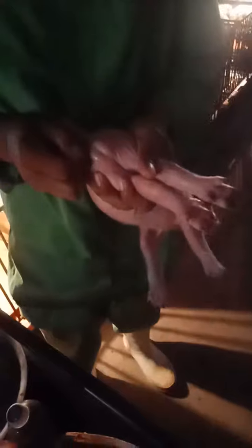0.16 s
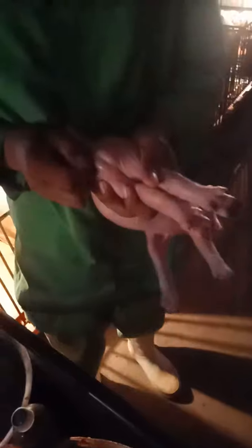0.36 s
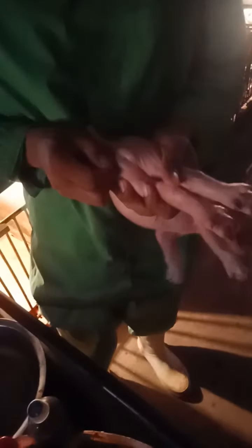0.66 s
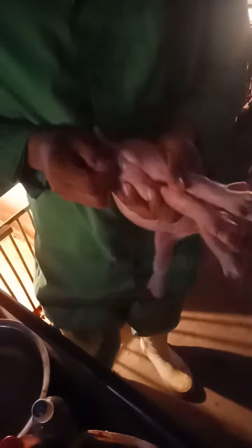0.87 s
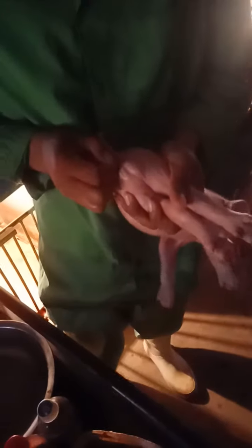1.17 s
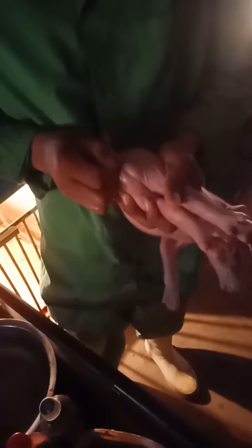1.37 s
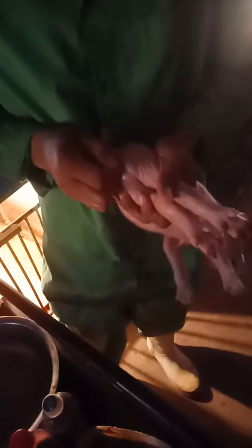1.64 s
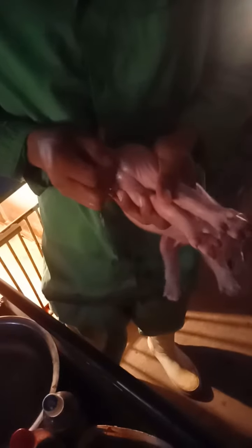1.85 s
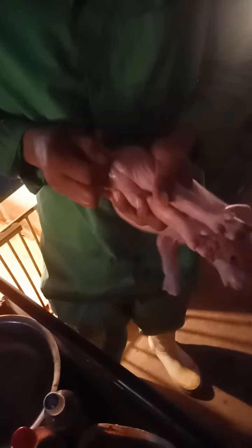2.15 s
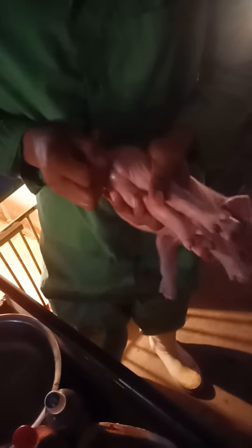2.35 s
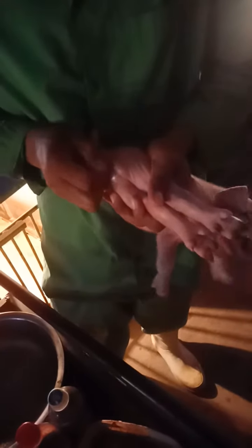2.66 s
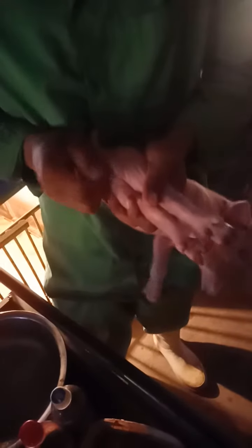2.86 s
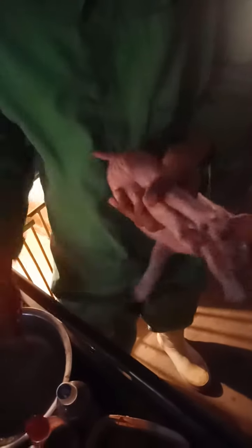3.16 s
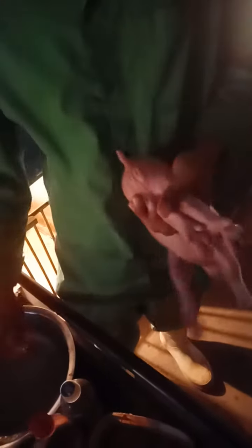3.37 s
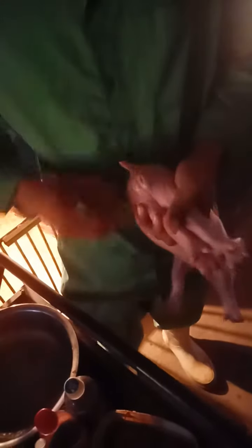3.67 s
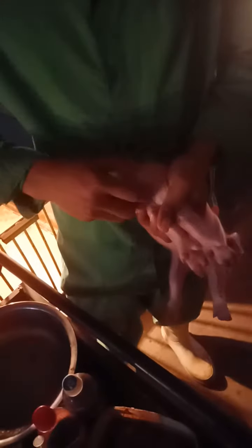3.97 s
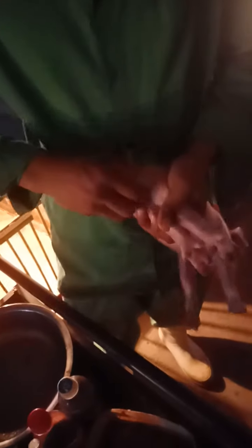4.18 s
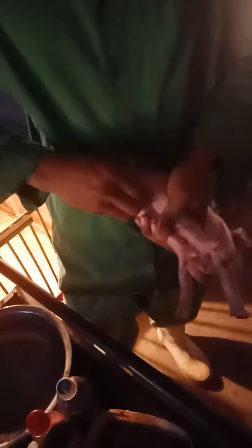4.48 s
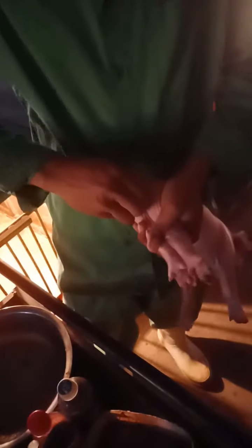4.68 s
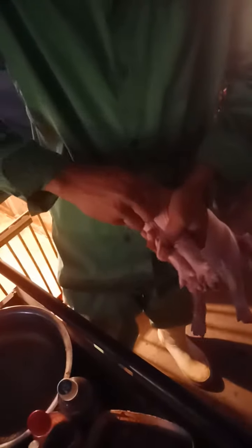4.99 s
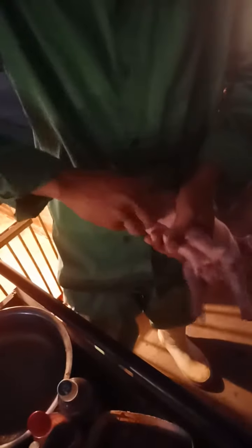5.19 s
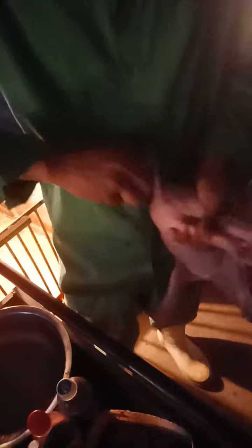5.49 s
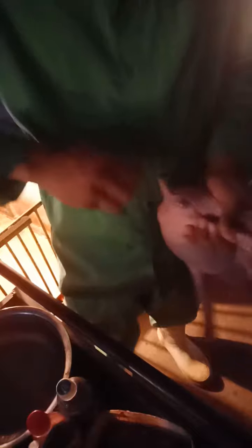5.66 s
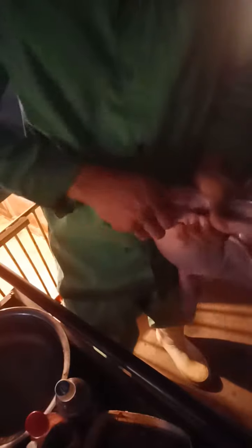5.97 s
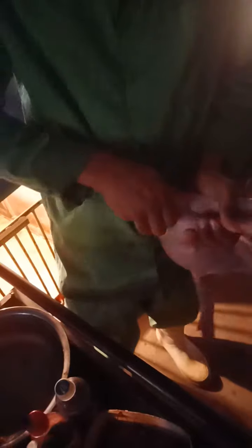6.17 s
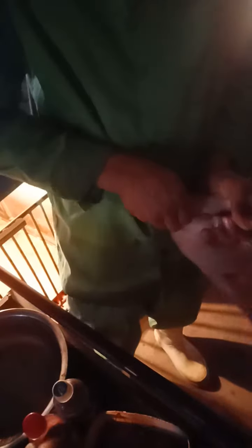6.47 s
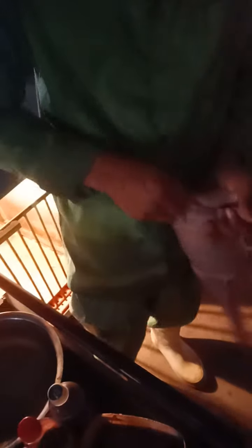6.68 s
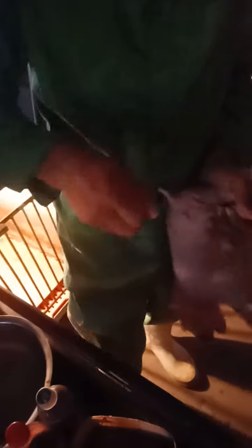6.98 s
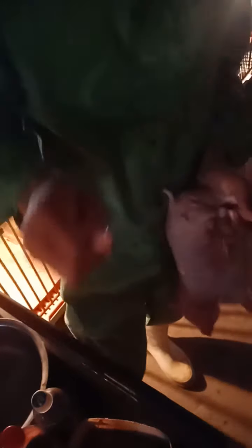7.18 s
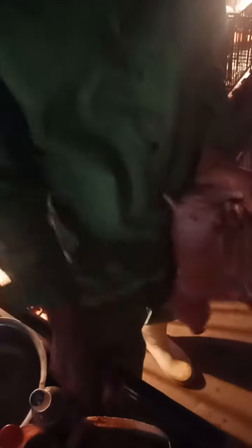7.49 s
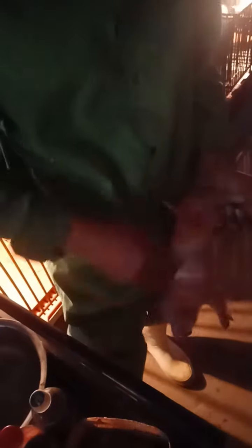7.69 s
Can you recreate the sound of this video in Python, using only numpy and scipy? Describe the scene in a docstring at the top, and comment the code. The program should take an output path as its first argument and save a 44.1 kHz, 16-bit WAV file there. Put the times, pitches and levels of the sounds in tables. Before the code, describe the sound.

In a hard-walled barn with fans rumbling, a distant piglet squeal is followed by piercing, hoarse squeals from a piglet right by the microphone. Its cries repeat with only brief gaps and become more drawn out toward the end. Litter mates keep squealing in the background, a sow barks gruffly now and then at a lower level, and a single sharp click comes during one of the longer screams.

```python
"""A piglet squeals, held up close to a phone microphone in a farrowing barn.
Its chaotic larynx rings a gliding throat resonance, inside a shriek from the mouth and a chest rasp.
Further off, litter mates squeal; a sow barks through snout and nose, fans rumble, and one dry tick sounds.
The floor reflects the piglet, and the hard barn walls ring on after piglet and sow."""
import sys
import numpy as np
from scipy import signal
from scipy.fft import rfft, irfft, next_fast_len
from scipy.io import wavfile
from scipy.ndimage import uniform_filter1d, minimum_filter1d, map_coordinates

SR = 44100
rng = np.random.default_rng(int(sys.argv[2]) if len(sys.argv) > 2 else 0)


def transcribe(u):
    """Save the signal u as a 16-bit wav file named by the first command-line argument.

    u: samples, shape (n,) or (channels, n), limited to [-1, 1]; the rate is SR.
    q: integer samples, one column per channel.
    """
    v = np.clip(np.atleast_2d(u).T, -1, 1)
    q = np.round(v * 32767).astype(np.int16)
    wavfile.write(sys.argv[1], SR, q)


N = 345744

# Close piglet, the mostly rising yelp that opens a squeal: t/s, length/s, f/Hz at start, middle, end,
# peak level/dB, peak position/share of length, overtone/dB relative to the yelp
YELPS = [(0.505, 0.15, 2330, 2610, 3400, -9, .68, -38), (1.182, 0.078, 2620, 2790, 3100, -6, .7, -41),
         (1.745, 0.099, 2280, 2760, 3300, -10.5, 0.8, -41),
         (2.429, 0.12, 2330, 2950, 4000, -10.5, 0.43, -48),
         (3.029, 0.11, 2440, 2660, 2920, -8.5, 0.56, -43), (4.322, .135, 2200, 2610, 2900, -9.5, .42, -23),
         (5.797, 0.13, 3000, 3430, 3750, -11, 0.39, -50), (6.671, 0.037, 2520, 2400, 2500, -22.5, .5, -39),
         (7.743, 0.085, 2310, 2100, 2400, -32, .5, -40)]
# Held throat rings: t/s, length/s, f/Hz at start, middle, end, level/dB at start, end, nominal width/Hz
THROAT_RINGS = [(0.482, .06, 870, 860, 900, -34, -30, 200),
                (0.563, 0.35, 1490, 1600, 1670, -35.5, -35, 150),
                (0.64, 0.33, 3560, 3630, 3650, -16, -14.5, 230),
                (0.73, 0.24, 4340, 4360, 4330, -23, -21, 80), (0.7, 0.28, 2600, 2580, 2540, -26, -26, 150),
                (1.271, .285, 3130, 3300, 2820, -26, -17, 453),
                (1.281, 0.18, 4080, 3980, 4030, -26, -28, 150),
                (1.851, 0.16, 3260, 3170, 3200, -24, -20, 280),
                (1.927, 0.24, 4150, 4010, 3845, -28, -3, 160),
                (2.544, 0.29, 3730, 3810, 3830, -17, -14.5, 400),
                (2.554, 0.29, 3340, 3110, 2950, -21.5, -18, 450),
                (3.042, 0.48, 1510, 2030, 2140, -28.5, -31.5, 250),
                (3.127, 0.35, 3990, 3970, 3990, -24, -25.5, 150),
                (3.144, .4, 2830, 2940, 3140, -16.5, -17, 285),
                (3.25, .295, 3450, 3600, 3680, -29, -14.5, 220),
                (3.536, .04, 3730, 3100, 2420, -15, -13.5, 220),
                (4.441, .35, 2960, 3600, 3630, -19, -11.5, 284),
                (4.88, .74, 2160, 2440, 2450, -25.5, -31, 297),
                (4.94, .14, 3200, 3200, 3280, -20, -15, 380),
                (5.078, .555, 3400, 3860, 3500, -15, -13, 240),
                (5.08, .54, 3150, 3050, 3100, -19, -23, 350),
                (5.905, 0.585, 3820, 3600, 3370, -14, -13, 220),
                (6.034, 0.15, 1550, 1730, 1900, -25, -27, 201),
                (6.743, 0.27, 3210, 3290, 3440, -15, -14.5, 610),
                (6.996, 0.5, 3620, 3540, 3560, -13, -13, 160)]
# Breathy scream around the rings: t/s, mouth opening time/s, end/s, base shriek level/dB, treble lift/dB,
# upper resonance f/Hz, chest rasp level/dB at start, end
SCREAMS = [(0.48, 0.21, 1.01, -19, 3, 8700, -20.5, -47), (1.175, 0.1, 1.545, -21.5, 5.5, 8400, -23, -37.5),
           (1.735, 0.15, 2.22, -21.5, 5.5, 8250, -27, -28.5),
           (2.411, 0.11, 2.846, -22.5, 3.5, 8100, -20.5, -35),
           (3.042, 0.1, 3.603, -18.5, 3, 8100, -25, -25), (4.31, 0.14, 4.83, -20.5, 5, 7800, -21.5, -23.5),
           (4.882, 0.18, 5.631, -24, 1.5, 7960, -28, -44.5), (5.786, 0.04, 6.52, -28, 5, 8000, -27, -19),
           (6.69, 0.05, 7.57, -25, 5, 8100, -28.5, -25.5), (7.734, 0.13, 8.1, -32, 1, 8000, -21.5, -24)]
# Spectra of the open mouth and the chest rasp: f/Hz, relative level/dB
MOUTH_SPECTRUM = [(2400, -32.5), (3300, 7), (4400, -1), (4900, -5.5), (5400, -17.5), (6300, -23.5),
                  (7200, -34), (9300, -37), (10300, -41), (11500, -36.5), (12300, -41.5), (13500, -36),
                  (15500, -46)]
RASP_SPECTRUM = [(1000, -61), (1550, -8.5), (1950, -2.5), (2500, 8), (3300, 4), (4000, -21), (5000, -54.5)]
# Floor bounce from piglet to microphone: delay/s, level/dB relative to the direct sound
FLOOR_ECHOES = [(.0058, -7.5)]
# Single litter mates, further off: t/s, length/s, throat ring f/Hz, width/Hz, level/dB at start, end
LITTER_CALLS = [(0, 0.32, 3095, 333, -29, -11), (2.289, 0.19, 3290, 303, -29.5, -19),
                (3.587, 0.61, 3054, 69.4, -23.5, -20), (4.792, 0.21, 3170, 199, -24, -26.5),
                (5.665, 0.12, 3080, 201, -29.5, -18.5)]
# The rest of the litter: t/s, level/dB
CROWD_LEVELS = [(0, -37), (1.1, -29.5), (2.3, -34), (2.9, -47), (3.0, -56), (3.6, -36), (5.9, -20),
                (6.66, -30), (7.84, -28)]
# Sow barks: t/s, breath level/dB, attack/s, decay time/s, tilt from snout to nose/dB, resonance f/ratio
BARKS = [(0.943, -36.5, 0.0055, 0.1, -5, 0.95), (1.872, -35.5, 0.012, 0.081, -1.5, 0.88),
         (2.6, -35, 0.012, 0.062, 0, 0.9), (4.13, -28.5, 0.0096, 0.037, -2, 0.96),
         (4.155, -20.5, 0.0047, 0.09, -3, 0.95), (4.708, -31, 0.0072, 0.024, -3.5, 0.813),
         (6.262, -30.5, 0.038, 0.058, -3, 0.86), (6.815, -39.5, 0.027, 0.055, -4, .93)]
# Resonances of the sow's open snout and nose: f/Hz, width/Hz, relative level/dB
SNOUT_MODES = [(1058, 64, -2), (1415, 80, -3), (1660, 65, -2), (2046, 83, -3.5)]
NOSE_MODES = [(358.5, 58, 8.5), (600, 97, -1.5)]
# Dry tick: t/s, peak level/dB
TICKS = [(5.3777, -10)]
# Level of the steady fan noise as the phone's automatic gain rises and dips: t/s, level/dB
FAN_LEVELS_AFTER_GAIN = [(0, -33), (.29, -22.5), (.6, -36.5), (1.5, -36.5), (2.4, -42.5), (4.6, -36),
                         (5.4, -41), (6.4, -41.5), (7.84, -39)]
# Spectra of the fans' rumble and rush of air: f/Hz, relative level/dB
RUMBLE_SPECTRUM = [(20, -54.5), (40, -37.5), (58, -9.5), (78, 4), (110, 0.5), (200, -7.5), (320, -54.5)]
AIR_SPECTRUM = [(100, -29.5), (200, -0.5), (400, -6.5), (550, -1), (800, -6), (1300, -8.5), (2500, -6),
                (4500, -19.5), (7000, -37.5), (15000, -74)]
# Reverberation of the barn: f/Hz, time to fall 60 dB/s
BARN_DECAY = [(300, 0.85), (1500, 1.14), (4000, 0.81), (8000, 0.37)]

YELP_WIDTH_HZ, YELP_RISE_DB, YELP_FALL_DB = 221, 10.5, 7.5
OVERTONE_RATIO, OVERTONE_WIDTH_HZ = 2.15, 900
BREATHY_WIDTH_HZ = 380  # a ring this wide is all breath; a narrower one turns partly into a whistle
BEAD_HZ, BEAD_DEPTH = 125, .7  # fold beats that chop the whistle
WAVER_SHARE, EDGE_S = 0.3055, 0.0066  # whistle: pitch waver as a share of ring width; soft ends
UPPER_WIDTH_HZ, UPPER_LIFT_DB = 530, 9
SHUT_DB, TIRING_DB, RASP_SWELL_S, RELEASE_DB_PER_S = 24, 5.5, 0.035, 1300
CROWD_HZ, CROWD_WIDTH_HZ, CALL_FADE_DB_PER_S = 3057, 550, 348
BARK_HOLD_S = 0.039
AIR_DB, AIR_FOLLOWS = 2.5, 0.82  # the rush over the rumble; its share of the gain swings
LIMITER_CEILING, TOP_HZ = .9, 15500
FRAME = dict(fs=SR, nperseg=512, noverlap=384)


def piglet():
    """Close to the microphone: a whistle, and breath shaped by the throat, mouth and chest."""
    return (whistle()
            + tract(larynx(flap_hz=160, depth=0.26), throat)
            + tract(larynx(flap_hz=150, depth=0.19), scream))


def glides(t):
    """Each yelp and held ring at times t: when it sounds, its pitch, level, width and overtone."""
    arc = lambda hz, done: np.polyval(np.polyfit([0, .5, 1], hz, deg=2), done)
    for start, length, *arc_hz, peak_db, peak_at, overtone_db in YELPS:
        now, done = stage(t, start, length)
        db = peak_db - np.interp(done, [0, peak_at, 1], [YELP_RISE_DB, 0, YELP_FALL_DB])
        yield now, arc(arc_hz, done), db, YELP_WIDTH_HZ, overtone_db
    for start, length, *arc_hz, first_db, last_db, width_hz in THROAT_RINGS:
        now, done = stage(t, start, length)
        yield now, arc(arc_hz, done), first_db + (last_db - first_db) * done, width_hz, None


def tone_share(width_hz):
    """Share of a ring's power that is whistle."""
    return np.clip(1 - width_hz / BREATHY_WIDTH_HZ, 0, .8)


def whistle():
    """The tonal core of each ring wavers and breaks into beads with the uneven beat of the folds."""
    x, waver = np.zeros(N), unit(wobble(70))
    beat = np.cos(phase(BEAD_HZ * (1 + .2 * wobble(25))))
    beads = unit((1 + BEAD_DEPTH * beat) * amp(2.7 * wobble(60)))
    for k, (now, hz, db, width_hz, _) in enumerate(glides(np.arange(N) / SR)):
        count = np.arange(now.sum())
        edges = np.minimum(1, np.minimum(count, count[::-1]) / (EDGE_S * SR))
        pitch = hz + WAVER_SHARE * width_hz * np.roll(waver, k * SR // 7)[now]
        x[now] += np.sqrt(2 * tone_share(width_hz)) * amp(db) * edges * beads[now] * np.sin(phase(pitch))
    return x


def larynx(flap_hz, depth):
    """Turbulent air chopped by folds that flap unevenly."""
    flapping = np.cos(phase(flap_hz * (1 + .25 * wobble(30))))
    return rng.standard_normal(N) * (1 + depth * flapping) * amp(0.46 * wobble(14))


def tract(breath, shape):
    """The vocal tract filters breath with a moving gain, shape(f/Hz, t/s)."""
    hz, t, spectrum = signal.stft(unit(breath), **FRAME)
    return signal.istft(spectrum * shape(hz[:, None], t), **FRAME)[1][:N]


def throat(hz, t):
    """Gain of the gliding throat resonances: the breathy part of each ring, plus the yelps' overtone."""
    power = np.zeros((len(hz), len(t)))
    for now, ring_hz, db, width_hz, overtone_db in glides(t):
        width = width_hz * amp(0.02 * (db + 17.5))  # slightly wider when louder
        resonance = ring(hz, ring_hz, width, steep=0.79)
        power[:, now] += (1 - tone_share(width_hz)) * (amp(db) * resonance) ** 2
        if overtone_db is not None:
            overtone = ring(hz, OVERTONE_RATIO * ring_hz, OVERTONE_WIDTH_HZ, steep=1.4)
            power[:, now] += (amp(db + overtone_db) * overtone) ** 2
    return np.sqrt(power) * flicker(power.shape, depth_db=3.0)


def scream(hz, t):
    """Gain of the shriek from the opening mouth and the rasp from the chest."""
    power = np.zeros((len(hz), len(t)))
    for start, opening_s, end, shriek_db, lift_db, upper_hz, first_db, last_db in SCREAMS:
        length = end - start
        now = (t > start) & (t < end + 60 / RELEASE_DB_PER_S)
        age = t[now] - start
        done = np.minimum(age / length, 1)
        shut = np.clip(1 - age / opening_s, 0, 1)
        swept_hz = hz * (1 + 0.15 * shut)  # resonances sweep up as the mouth opens
        mouth = band_shape(MOUTH_SPECTRUM, swept_hz)
        shriek = amp(shriek_db - SHUT_DB * shut - TIRING_DB * done ** 2 + lift_db * (hz > 6500)) * mouth
        shriek *= amp(UPPER_LIFT_DB / (1 + (2 * (swept_hz - upper_hz) / UPPER_WIDTH_HZ) ** 2))
        chest = band_shape(RASP_SPECTRUM, hz / (0.84 + 0.23 * done))  # rises as the neck stretches
        rasp = amp(first_db + (last_db - first_db) * done) * chest * np.minimum(1, age / RASP_SWELL_S)
        release = amp(-RELEASE_DB_PER_S * np.maximum(age - length, 0))
        power[:, now] += (shriek ** 2 + rasp ** 2) * release ** 2
    return np.sqrt(power) * flicker(power.shape, depth_db=5.0)


def ring(hz, centre_hz, width_hz, steep):
    """A resonance peak of unit power, with nothing far above or below it."""
    ratio = (hz + 1) / centre_hz
    skirt = (1 + (ratio / 1.19) ** 8) * (1 + (0.64 / ratio) ** 6)
    peak = (1 + (2 * (hz - centre_hz) / width_hz) ** 2) ** -steep
    return unit(peak / skirt, axis=0)


def flicker(shape, depth_db):
    """Chaotic folds favour narrow bands that come and go, and broad patches that flutter faster."""
    bands = uniform_filter1d(rng.standard_normal(shape), size=40, axis=1)
    flutter = uniform_filter1d(rng.standard_normal(shape), size=12, axis=1)
    patches = uniform_filter1d(flutter, size=25, axis=0)
    return amp(depth_db * (unit(bands) + 0.45 * unit(patches)))


def floor_bounce(x):
    """A short echo off the floor combs the spectrum at the microphone."""
    echo = lambda hz: sum(amp(db) * np.exp(-2j * np.pi * hz * delay) for delay, db in FLOOR_ECHOES)
    return filtered(x, lambda hz: unit(1 + echo(hz)))


def litter():
    """Further off: blurred rings with a faint octave, rasp and shriek; single calls top the crowd."""
    def throats(hz, t):
        rasp = amp(-18) * band_shape(RASP_SPECTRUM, hz)
        shriek = amp(-16.5) * band_shape(MOUTH_SPECTRUM, hz)

        def voice_power(ring_hz, width_hz, octave_db):
            octave = amp(octave_db) * ring(hz, 2 * ring_hz, width_hz=640, steep=0.6)
            return ring(hz, ring_hz, width_hz, steep=0.58) ** 2 + octave ** 2 + rasp ** 2 + shriek ** 2

        power = amp(2 * level_at(CROWD_LEVELS, t)) * voice_power(CROWD_HZ, CROWD_WIDTH_HZ, octave_db=-31)
        for start, length, ring_hz, width_hz, first_db, last_db in LITTER_CALLS:
            end = start + length
            now = (t >= start) & (t < end + 60 / CALL_FADE_DB_PER_S)
            db = np.interp(t[now], [start, end, end + 1], [first_db, last_db, last_db - CALL_FADE_DB_PER_S])
            power[:, now] += amp(2 * db) * voice_power(ring_hz, width_hz, octave_db=-31.5)
        return np.sqrt(power) * flicker(power.shape, depth_db=3.2)
    return tract(larynx(flap_hz=40, depth=0.05), throats)


def sow():
    """Each bark is a short rough burst of air through snout and nose."""
    t, x = np.arange(N) / SR, np.zeros(N)
    breath = larynx(flap_hz=55, depth=0.7)
    for start, db, attack, decay, nasal_db, tuning in BARKS:
        rise = np.clip((t - start) / attack, 0, 1)
        fall = np.exp(-np.clip(t - start - attack - BARK_HOLD_S, 0, 5) / decay)
        airways = lambda hz: (amp(-nasal_db) * cavity(SNOUT_MODES, hz / tuning)
                              + amp(nasal_db) * cavity(NOSE_MODES, hz / tuning))
        x += filtered(amp(db) * rise * fall * breath, airways)
    return x


def cavity(modes, hz):
    """Response of an airway: resonances of alternating sign, dull above them."""
    peaks = sum((-1) ** k * amp(db) * 1j * hz * width / (centre ** 2 - hz ** 2 + 1j * hz * width)
                for k, (centre, width, db) in enumerate(modes))
    return unit(peaks / (1 + 1j * hz / 2500) ** 4)


def tick():
    """One sharp, dry click."""
    x = np.zeros(N)
    for start, db in TICKS:
        x[round(start * SR)] = amp(db)
    return x


def fans():
    """Steady ventilation, a lumpy rumble and a rush of air; a set curve stands for the phone's gain."""
    db = level_at(FAN_LEVELS_AFTER_GAIN, np.arange(N) / SR)
    air_db = db.mean() + AIR_DB + AIR_FOLLOWS * (db - db.mean())
    rumble = unit(filtered(rng.standard_normal(N), lambda hz: band_shape(RUMBLE_SPECTRUM, hz)))
    air = unit(filtered(rng.standard_normal(N), lambda hz: band_shape(AIR_SPECTRUM, hz)))
    return amp(db + 0.75 * wobble(8.2)) * rumble + amp(air_db + 0.57 * wobble(6.9)) * air


def barn(x):
    """The hard walls answer about 14 ms later; each frequency dies at its own speed."""
    hz, t, noise = signal.stft(rng.standard_normal(SR), SR, nperseg=256)
    decay = amp(-60 * t / along(BARN_DECAY, hz)[:, None])
    tail = signal.istft(noise * decay, SR, nperseg=256)[1]
    return signal.fftconvolve(np.pad(x, (600, 0)), tail / np.linalg.norm(tail))[:N]


def amp(db):
    return 10 ** (np.asarray(db) / 20)


def unit(x, axis=None):
    """x scaled to an RMS of one."""
    return x / np.sqrt(np.mean(np.abs(x) ** 2, axis=axis, keepdims=True) + 1e-20)


def phase(hz):
    return 2 * np.pi * np.cumsum(hz) / SR


def along(points, hz):
    """(f/Hz, value) points joined on a log frequency axis."""
    knots_hz, values = np.transpose(points)
    return np.interp(np.log(hz + 1), np.log(knots_hz + 1), values)


def band_shape(spectrum, hz):
    """Gain of unit power through (f/Hz, level/dB) points."""
    return unit(amp(along(spectrum, hz)), axis=0)


def level_at(points, t):
    return np.interp(t, *np.transpose(points))


def stage(t, start, length):
    """Which times fall inside an event, and how far through it they are."""
    now = (t >= start) & (t <= start + length)
    return now, (t[now] - start) / length


def wobble(rate):
    """A smooth random curve, rate knots a second."""
    return map_coordinates(rng.standard_normal(int(N * rate / SR) + 4), [np.arange(N) * rate / SR])


def filtered(x, response):
    """x through a complex frequency response."""
    size = next_fast_len(N + SR)
    return irfft(rfft(x, size) * response(np.fft.rfftfreq(size, 1 / SR)), size)[:N]


def scene():
    """At the one microphone: piglet up close, sow, their echo in the barn, then the background."""
    squeals, barks = floor_bounce(piglet()), sow()
    walls = barn(amp(-15.5) * squeals + amp(-8.5) * barks)
    return (squeals + barks + walls + litter() + fans() + tick())[None]


def record(dry):
    """The phone's limiter holds the peaks; nothing is kept above its band limit."""
    needed = np.minimum(1, LIMITER_CEILING / (np.abs(dry[0]) + 1e-9))
    gain = uniform_filter1d(minimum_filter1d(needed, size=151), size=151)
    return filtered(gain * dry[0], lambda hz: hz < TOP_HZ)[None]


dry = scene()
out = record(dry)
transcribe(out)
```